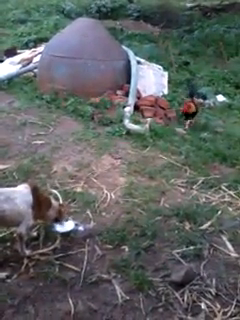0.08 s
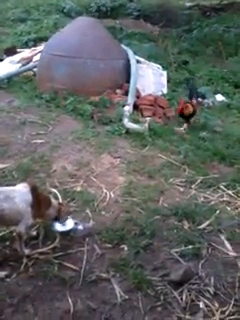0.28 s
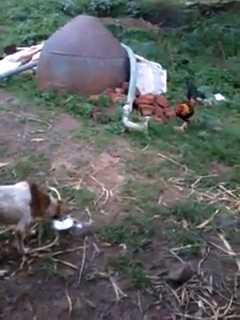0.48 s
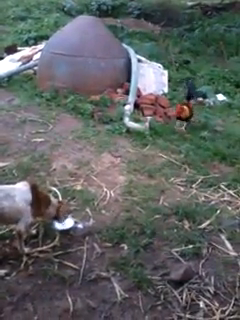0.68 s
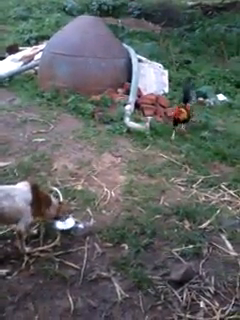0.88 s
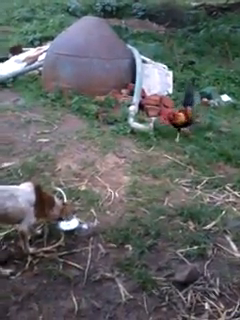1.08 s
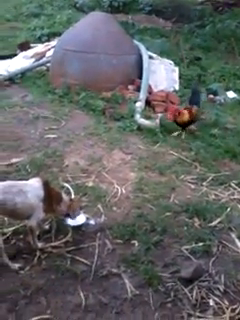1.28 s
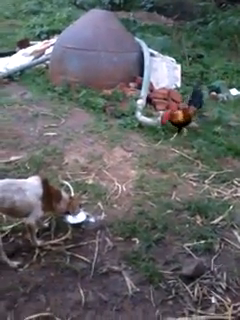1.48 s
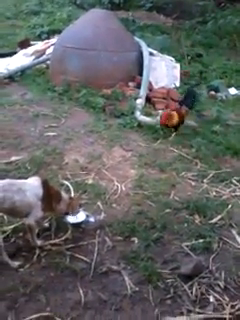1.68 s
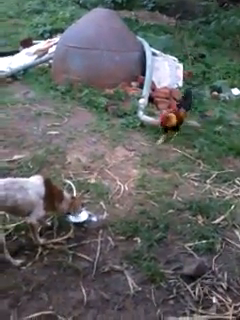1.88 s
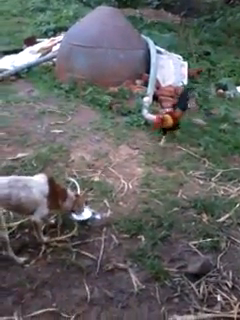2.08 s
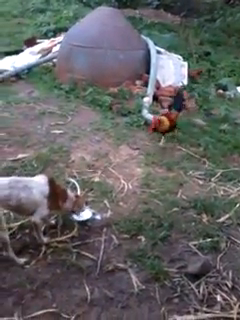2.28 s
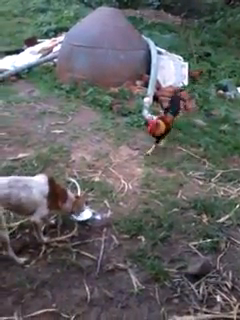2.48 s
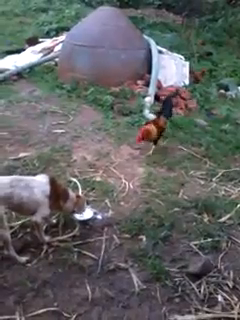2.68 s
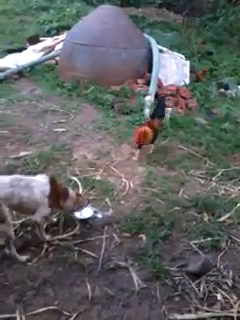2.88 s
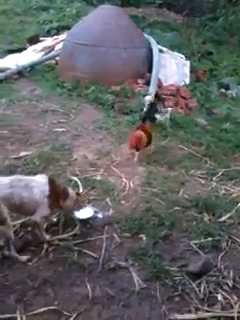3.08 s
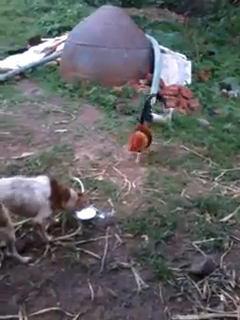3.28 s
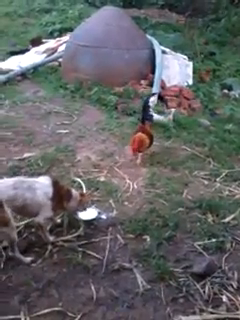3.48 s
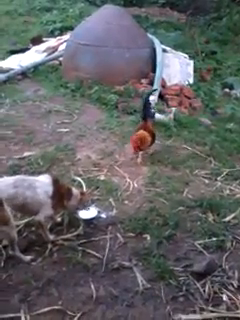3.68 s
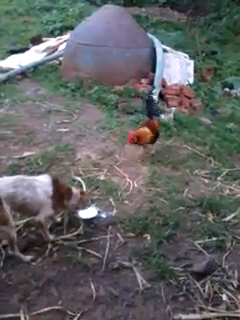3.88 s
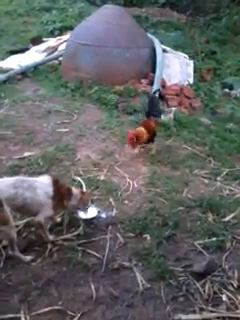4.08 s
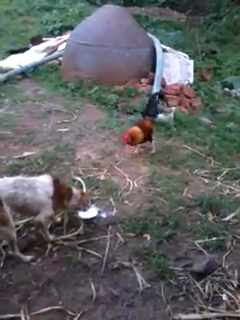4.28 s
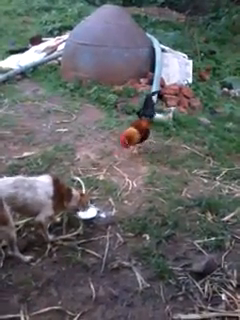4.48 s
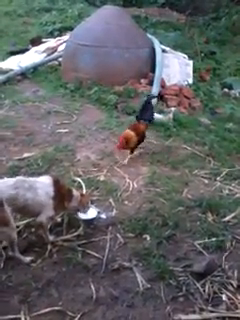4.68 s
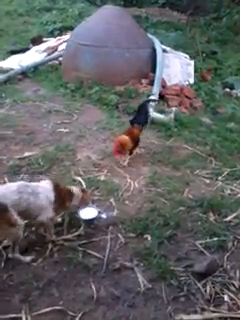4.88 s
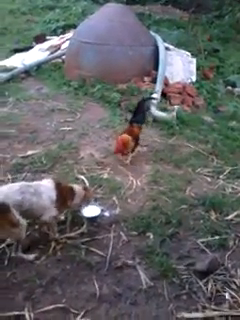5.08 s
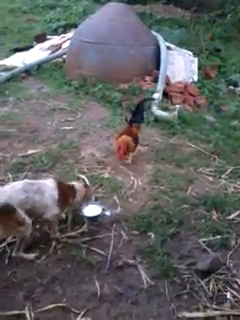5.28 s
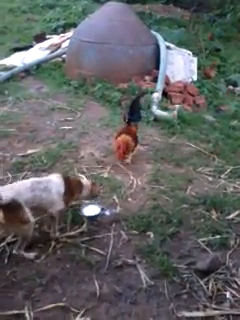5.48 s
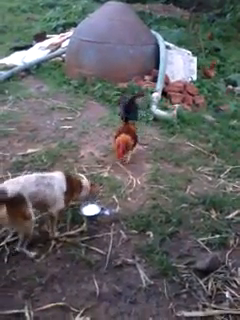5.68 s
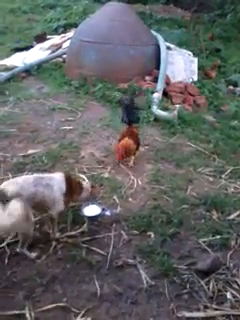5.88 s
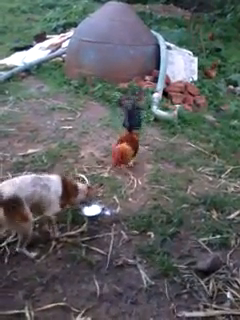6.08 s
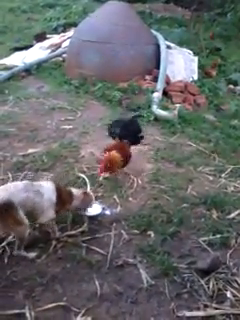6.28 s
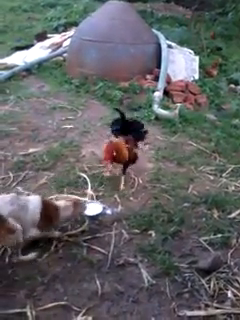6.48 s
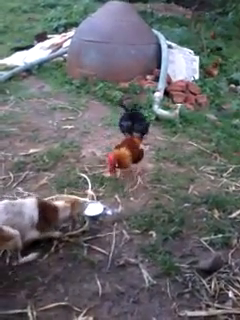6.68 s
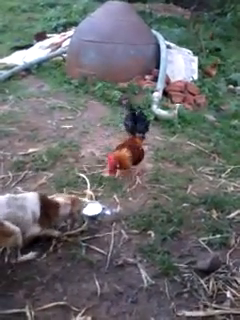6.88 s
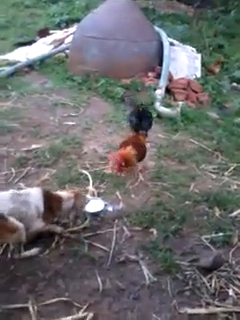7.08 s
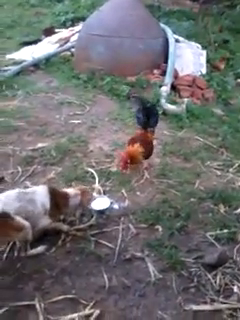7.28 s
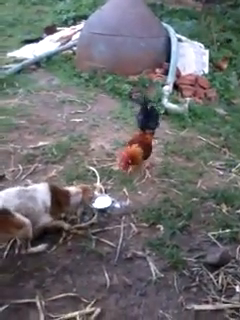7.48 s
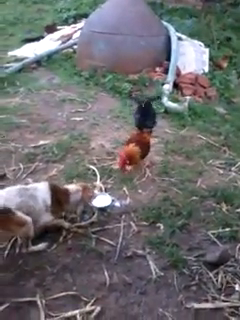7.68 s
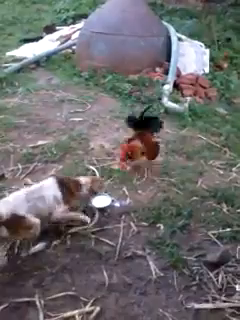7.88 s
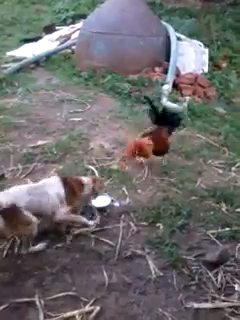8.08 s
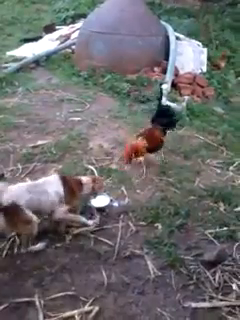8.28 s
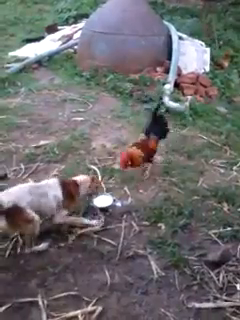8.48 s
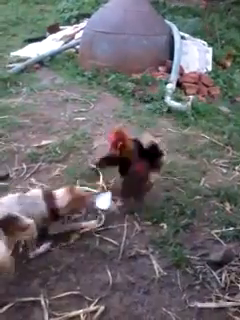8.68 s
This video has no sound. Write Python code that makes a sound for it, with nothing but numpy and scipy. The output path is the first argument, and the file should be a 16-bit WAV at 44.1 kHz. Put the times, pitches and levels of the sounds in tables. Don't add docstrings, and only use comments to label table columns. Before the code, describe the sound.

A small dog growls hoarsely and gives seven short, sharp barks close by in a farm yard, with snorts, little clicks and distorted peaks.

```python
import sys
import numpy as np
from scipy import signal
from scipy.io import wavfile
from scipy.ndimage import uniform_filter1d, minimum_filter1d

SR = 44100
rng = np.random.default_rng(int(sys.argv[2]) if len(sys.argv) > 2 else 0)


def dump_mix(stems):
    frames = np.atleast_2d(stems).T
    limited = np.clip(frames, -1, 1)
    pcm = np.round(limited * 32767).astype(np.int16)
    wavfile.write(sys.argv[1], SR, pcm)


def volts_from_db(level):
    exponent = np.asarray(level, float) / 20
    return 10 ** exponent


N = 383669


def rms_one(x):
    return x / np.sqrt(np.mean(x ** 2) + 1e-20)


def evened(x, over_s):
    return x / np.sqrt(uniform_filter1d(x ** 2, size=int(over_s * SR)) + 1e-12)


def drift(rate_hz):
    r = np.exp(-2 * np.pi * rate_hz / SR)
    noise = rng.standard_normal(N + SR)
    return rms_one(signal.lfilter([1], [1, -2 * r, r * r], noise)[SR:])


def filtered(x, order, hz, kind="low"):
    return signal.sosfilt(signal.butter(order, hz, kind, fs=SR, output="sos"), x)


def resonate(x, hz, width_hz):
    turn = np.exp(2j * np.pi * np.cumsum(np.broadcast_to(hz, N)) / SR)
    r = np.exp(-np.pi * 1.55 * width_hz / SR)
    return 2 * np.real(turn * signal.lfilter([(1 - r) ** 2], [1, -2 * r, r * r], x / turn))


def slaps(per_s, wobble, spread_db, air):
    cycles = np.cumsum(per_s * np.exp(wobble * drift(60))) / SR
    closures = np.diff(np.floor(cycles), prepend=0) * volts_from_db(spread_db * rng.standard_normal(N))
    puff = np.exp(-3.0 * (cycles % 1)) * rng.standard_normal(N)
    return rms_one(closures) + air * rms_one(puff)


def swells(peak_s, rise_s, fall_s, peak_db, edge_db, *carried):
    t = np.arange(0, N + 64, 64) / SR
    away = t - peak_s[:, None]
    away = away / np.where(away < 0, rise_s[:, None], fall_s[:, None])
    floor_db = -150 - 20 * abs(away) ** .5
    level_db = np.maximum(peak_db[:, None] - edge_db * away ** 2, floor_db)
    power = volts_from_db(2 * level_db) + 1e-300
    total = power.sum(axis=0)
    weakness = (power * np.minimum(away ** 2, 1)).sum(axis=0) / total
    curves = [np.sqrt(total), weakness]
    curves += [(power * column[:, None]).sum(axis=0) / total for column in carried]
    return [np.interp(np.arange(N) / SR, t, curve) for curve in curves]


def yard_noise(patchy_db):
    # (f/Hz, level per Hz/dB)
    yard_colour = [(15, -42), (25, 1.5), (58, -3.5), (102, -36), (321, -0.5), (518, 4.5), (855, -0.5),
                   (1010, 4), (1410, -9), (1880, -4.5), (3100, -14), (6820, -15.5), (7500, -41),
                   (9750, -71), (16500, -120)]
    hz, db = np.transpose(yard_colour)
    edges = 22 * 2 ** np.arange(0, 8.5, .4)
    white = rng.standard_normal((2, N))
    out = 0
    for k, (low, high) in enumerate(zip(edges, edges[1:])):
        band = filtered(white[k % 2], 2, [low, high], "band")
        band_db = np.interp(np.log(low * high) / 2, np.log(hz), db)
        out = out + band * volts_from_db(band_db + patchy_db * drift(20.0))
    return volts_from_db(-53.5) * rms_one(out)


def clicks():
    # (t/s, peak level/dB, f/Hz, length/s, bright level/dB)
    bowl_clicks = [(0.243, -34.5, 1060, 0.0095, 6), (0.756, -37, 495, 0.014, -28),
                   (0.888, -39, 520, 0.004, -16), (1.38, -38, 535, 0.0095, 3), (1.391, -39, 636, 0.032, 11),
                   (1.441, -32, 670, 0.028, 14), (1.499, -29, 720, 0.032, 6.5),
                   (2.194, -49, 729, 0.0096, 16), (2.207, -25.5, 710, 0.023, 9.5),
                   (2.258, -36, 730, 0.0094, -24), (2.294, -36, 704, 0.012, -25),
                   (2.343, -32.5, 686, 0.0097, -22), (2.616, -36.5, 1192, 0.031, -17),
                   (3.399, -33, 654, 0.013, 4), (3.429, -32, 710, 0.0087, -13),
                   (3.97, -33.5, 700, 0.0076, -21), (4.16, -30, 750, 0.01, -36),
                   (4.261, -36.5, 631.5, 0.0087, 8), (4.383, -39.5, 1895, 0.013, -25),
                   (7.148, -30, 653, 0.0044, -30), (7.304, -28, 534, 0.015, 0), (7.394, -23, 720, 0.018, 8),
                   (7.825, -46, 1022, 0.01, 11), (7.89, -36.5, 494, 0.016, -17),
                   (.12, -43, 600, .012, -20), (1.131, -32, 754, 0.011, -20), (1.853, -22, 750, 0.011, -20),
              (3.575, -28, 745, .012, -18), (4.226, -39, 647.7, .01, -22), (5.192, -35, 750, .012, -20),
              (7.197, -38, 803, 0.0097, -1), (8.46, -29, 649.8, .012, -23)]
    contacts = bowl_clicks
    out, white = np.zeros(N), rng.standard_normal((len(contacts), 2048))
    t = np.arange(2048) / SR
    for (s, db, hz, length_s, bright_db), noise in zip(contacts, white):
        burst = noise * np.sin(np.pi * np.clip(t / max(length_s, .002), 0, 1)) ** 2
        dull = filtered(burst, 2, [hz / 1.48, hz * 1.2], "band")
        bright = filtered(burst, 2, [1200, 3600], "band")
        click = dull / abs(dull).max() + volts_from_db(bright_db - 8.5) * bright / abs(bright).max()
        i = round((s - .002) * SR)
        out[i:i + 2048] += volts_from_db(db) * click
    return out


def growls():
    # (peak t/s, rise/s, fall/s, chest level/dB, mouth level/dB)
    long_growls = [(0.491, 0.049, 0.21, -40.5, -42.5), (0.638, 0.22, .1, -39.5, -51),
                   (.93, 0.02, .25, -37.5, -47.5), (1.15, 0.065, 0.04, -35, -43.5),
                   (1.264, 0.17, 0.077, -33, -42), (1.73, 0.13, 0.13, -40, -54),
                   (1.858, 0.13, 0.077, -30, -32), (2.004, 0.053, 0.038, -26, -26),
                   (2.451, 0.047, 0.073, -31, -32.5), (2.74, 0.16, 0.07, -53, -53),
                   (3.301, 0.085, 0.11, -54.5, -37.5), (3.52, .07, 0.1, -38.5, -48.5),
                   (3.601, 0.072, 0.11, -35.5, -27.5), (3.681, 0.066, 0.049, -30, -31),
                   (3.81, 0.092, 0.029, -35.5, -36.5), (5.272, 0.14, 0.052, -46, -39.5),
                   (5.76, 0.11, 0.068, -44, -36), (5.89, 0.15, 0.039, -43.5, -36),
                   (7.398, 0.13, .1, -33, -25), (7.488, 0.13, 0.15, -29.5, -44.5),
                   (8.19, 0.1, .12, -42.5, -39), (8.36, 0.043, 0.12, -34, -41.5),
                   (8.49, 0.13, 0.19, -27, -32.5)]
    # (peak t/s, fall/s, chest level/dB, mouth level/dB, chest f/Hz)
    grunts = [(.774, 0.031, -57.5, -46, 385.3), (2.081, 0.054, -46.5, -42.5, 302),
              (2.17, 0.057, -46, -48, 298), (2.62, 0.099, -63.5, -59, 298), (3.3, .04, -45.5, -35.5, 206),
              (3.881, .06, -40, -40.5, 208.5), (3.919, .05, -40.5, -46, 336.4),
              (3.992, 0.092, -40.5, -51, 298), (4.07, 0.038, -39.5, -51, 286.6),
              (4.138, 0.09, -37.5, -58, 314), (4.296, 0.11, -32, -43, 290.5),
              (4.411, 0.041, -41, -65, 315.8), (4.496, .04, -38, -54, 207.7),
              (4.529, .06, -38, -47.5, 353.6), (4.618, .06, -45.5, -41, 245),
              (2.789, .05, -46.5, -59.5, 245), (6.42, 0.172, -53.5, -41, 395.4),
              (6.89, 0.12, -33.5, -30, 314.2), (7.063, .12, -40, -41, 256),
              (7.202, 0.068, -52.5, -42.5, 329.2), (7.748, 0.21, -47.5, -56.5, 351.3),
              (8.29, .1, -30.5, -31.5, 312)]
    # (t/s, f/Hz)
    jaw = [(.5, 655), (1.1, 603), (1.269, 724), (1.7, 636), (1.86, 696), (2.5, 634), (3.35, 636),
           (3.5, 569.2), (3.65, 704), (3.82, 587), (4.3, 727), (5.251, 597), (5.8, 715), (6.45, 602),
           (7.42, 675), (8.28, 670), (8.41, 475), (8.521, 737)]
    growl_chest_hz, grunt_rise_s = 318.4, 0.0258
    rows = [(*growl, growl_chest_hz) for growl in long_growls]
    rows += [(s, grunt_rise_s, *rest) for s, *rest in grunts]
    s, rise_s, fall_s, chest_db, mouth_db, chest_hz = np.transpose(rows)
    chest_gain, weakness, chest_hz = swells(s, rise_s, fall_s, chest_db, 18, chest_hz)
    mouth_gain, closing = swells(s, rise_s, fall_s, mouth_db, 25.5)

    flaps = slaps(95, wobble=.35, spread_db=1.0, air=1.64)
    muffled = filtered(flaps, 6, 1200)
    chest_hz = chest_hz * (1 + 0.11 * drift(7.37) - .06 * weakness)
    hum = volts_from_db(-2 + 4 * drift(25)) * np.sin(2 * np.pi * np.cumsum(chest_hz) / SR)
    chest = evened(hum + evened(resonate(muffled, chest_hz, 51), 0.024), 0.033)

    mouth_hz = np.interp(np.arange(N) / SR, *np.transpose(jaw))
    mouth_hz = mouth_hz * (1 + 0.047 * drift(6.4) - 0.032 * closing)
    mouth = resonate(muffled, mouth_hz, 150) + volts_from_db(-6) * resonate(muffled, 951, 130)
    return chest_gain * chest + mouth_gain * evened(mouth, 0.036)


def breaths():
    # (peak t/s, rise/s, fall/s, level/dB, whistle f/Hz)
    wheezes = [(.55, 0.17, 0.16, -60.5, 2540), (.765, 0.042, 0.016, -60, 1560),
               (1.0, 0.18, 0.13, -64, 2350), (1.19, 0.1, 0.16, -59.5, 2480), (1.56, 0.02, .03, -59, 2500),
               (1.84, 0.035, 0.04, -49, 2480), (1.995, 0.023, 0.027, -47.5, 2500),
               (2.095, 0.018, 0.031, -48.5, 2700), (2.5, 0.058, .03, -53.5, 2550),
               (2.68, 0.159, .09, -57.5, 2300), (3.3, 0.054, 0.062, -50, 2250),
               (3.58, 0.038, 0.14, -51, 1800), (3.85, 0.69, 0.27, -62, 2000),
               (4.266, 0.029, 0.063, -56, 2440), (4.6, 0.09, 0.042, -56, 2680),
               (5.22, .06, .045, -48.5, 2380), (5.33, 0.36, .18, -60, 1890), (5.83, 0.11, 0.078, -46, 2750),
               (6.47, .06, 0.058, -50, 2740), (6.95, 0.5, 0.31, -52, 1850), (7.22, .15, .12, -48, 2050),
               (7.35, 0.1, 0.12, -39, 2200), (7.75, 0.11, 0.053, -59.5, 2450),
               (7.06, .04, 0.046, -51.5, 2504),
               (8.13, 0.051, .08, -51, 1860), (8.215, 0.057, 0.038, -46.5, 2855),
             (8.28, 0.071, .08, -48.5, 2093), (8.5, 0.13, 0.094, -53, 1800)]
    # (f/Hz, width/Hz, level/dB)
    nose_hiss = [(2700, 610, -4.5), (5700, 1400, -19)]
    s, rise_s, fall_s, level_db, whistle_hz = np.transpose(wheezes)
    gain, weakness, whistle_hz = swells(s, rise_s, fall_s, level_db, 13.5, whistle_hz)
    whistle_hz = whistle_hz * (1 - 0.056 * weakness)
    air = rng.standard_normal(N) * volts_from_db(2.5 * drift(40))
    wheeze = resonate(air, whistle_hz, 250) + volts_from_db(-15.5) * resonate(air, 1.87 * whistle_hz, 500)
    hiss = sum(volts_from_db(db) * resonate(air, hz, width_hz) for hz, width_hz, db in nose_hiss)
    return gain * evened(wheeze + volts_from_db(-5) * hiss, 0.04)


REST_HZ = 515.2


def bark_course(s, hold_s, db, onset_db, stretch, attack_s, onset_hz, top_hz, open_hz, shut_hz,
                clear, clear_late, rasp, rasp_late, tail_db):
    end, start_db = s + hold_s, db + onset_db
    sunk = stretch - 0.065
    strain_db, hold_sag_db, tail_rasp_db = -9.5, -4, -8
    # (t/s, effort/dB, pitch f/Hz, mouth f/Hz, clear level/dB, rasp level/dB, throat stretch)
    lead_in = (s - attack_s - .016, start_db - 52, .9 * onset_hz, .9 * open_hz, clear, rasp - 6, stretch)
    jump = (s - attack_s, start_db - 14.5, .95 * onset_hz, .97 * open_hz, clear, rasp - 5, stretch)
    onset = (s, start_db, onset_hz, open_hz, clear, rasp - 3, stretch)
    swell = (s + .3 * hold_s, db, (onset_hz + top_hz) / 2, open_hz, clear + strain_db, rasp, stretch)
    top = (s + 0.539 * hold_s, db + hold_sag_db / 3, top_hz, (open_hz + shut_hz) / 2,
           (clear + clear_late) / 2 + 3.5, (rasp + rasp_late) / 2, (stretch + sunk) / 2)
    hold_end = (end, db + hold_sag_db, REST_HZ, shut_hz, clear_late, rasp_late, sunk)
    drop = (end + 0.0079, db - 14, REST_HZ, shut_hz, clear_late, rasp_late + tail_rasp_db / 2, sunk)
    tail = (end + .11, db + tail_db, REST_HZ, 0.8 * shut_hz, clear_late, rasp_late + tail_rasp_db, sunk)
    return [lead_in, jump, onset, swell, top, hold_end, drop, tail]


def in_time(courses, fade_s=0.0052):
    t = np.arange(N) / SR
    s, *columns = np.transpose(np.concatenate(courses))
    gate = sum((t > rows[0][0]) & (t <= rows[-1][0]) for rows in courses) > 0
    return [np.interp(t, s, c) for c in columns], uniform_filter1d(gate * 1., size=int(fade_s * SR) + 1)


def barks():
    # (onset t/s, hold/s, effort/dB, onset against effort/dB, throat stretch at the start)
    bark_times = [
        (3, .09, -2, -9.5, 0.88),
        (4.904, .074, -2, -4, 0.98),
        (5.517, .113, -2, 2, 0.95),
        (6.162, .092, 0.5, -11, 1.016),
        (6.738, 0.054, -5, -5.5, 1.08),
        (7.991, .05, -2.5, 6.5, 1.04),
        (8.599, 0.039, -5, -5.5, 1.07),
    ]
    # (attack/s, onset f/Hz, top f/Hz, open mouth f/Hz, closing mouth f/Hz)
    bark_voices = [(0.00625, 515, 555, 650, 630), (.012, 440, 548, 720, 517), (0.0043, 452, 580, 880, 727),
                   (.01, 405, 545, 775, 600), (0.0056, 450, 520, 660, 700), (0.0025, 468, 520, 910, 830),
                   (0.036, 640, 440, 725, 660)]
    # (clear early/dB, clear late/dB, rasp early/dB, rasp late/dB, tail/dB)
    bark_tones = [(4.5, -2, -14.5, -12.5, -52), (1.5, 6, -12, -10, -41.5), (-5.5, -11, -6.5, -9.5, -45),
                  (1.5, 3.5, -14, -1.5, -37.5), (1, -10, -19, -15, -48), (-19.5, -6, -2, 5.5, -51.5),
                  (-7.5, -4.5, -15, -8, -25)]
    # (f/Hz, width/Hz, level/dB)
    throat_rings = [(1737, 200, 3), (2508, 234, -1), (3320, 380, -9.5), (4450, 1200, -18.5)]
    courses = [bark_course(*b, *v, *h) for b, v, h in zip(bark_times, bark_voices, bark_tones)]
    (effort_db, pitch_hz, mouth_hz, clear_db, rasp_db, throat), gate = in_time(courses)

    phase = 2 * np.pi * np.cumsum(pitch_hz * (1 + .022 * drift(55))) / SR
    octave_db = -8 + .03 * (mouth_hz - 645) + 0.0039 * (pitch_hz - REST_HZ) + 6.04 * drift(78)
    clear = volts_from_db(3.0 * drift(40)) * np.sin(phase) + volts_from_db(octave_db) * np.sin(2 * phase)

    chaos = slaps(170, wobble=.45, spread_db=5.5, air=2.05)
    mouth = evened(resonate(chaos, mouth_hz, 105), 0.024)
    stretch = throat + 0.014 * drift(7.7)
    gust = chaos + 3.3 * rng.standard_normal(N)
    rings = sum(volts_from_db(db) * resonate(gust, hz * stretch, width_hz) for hz, width_hz, db in throat_rings)
    rasp = evened(rings, 0.032)
    voice = volts_from_db(clear_db) * clear + mouth + volts_from_db(rasp_db) * rasp
    return gate * volts_from_db(effort_db) * evened(voice, 0.02)


def echoes(x):
    t = np.arange(SR // 2) / SR
    fade_60db_s = 0.37
    returns = rng.standard_normal(len(t)) * volts_from_db(-60 * t / fade_60db_s) * (t > .015)
    dull = filtered(filtered(returns, 1, [400, 2000], "band"), 2, 2900)
    shed_hz, shed_width_hz = 556, 290
    dull = dull + volts_from_db(1) * signal.lfilter(*signal.iirpeak(shed_hz, shed_hz / shed_width_hz, fs=SR), dull)
    return volts_from_db(-24) * signal.fftconvolve(x, dull / np.sqrt(np.sum(dull ** 2)))[:N]


def scene():
    dog = filtered(barks() + growls() + breaths(), 6, 162, "high")
    return (dog + echoes(dog) + clicks() + yard_noise(patchy_db=2.0))[None]


def faint_bands_dropped(x):
    frames = signal.stft(np.r_[x, x[:-1025:-1]], nperseg=512, noverlap=256)[2]
    bands = uniform_filter1d(abs(frames) ** 2, size=5, axis=0)
    loudest = np.roll(-minimum_filter1d(-bands.max(axis=0), size=11), -2)
    kept = bands > loudest ** .7 * volts_from_db(2 * -59)
    kept[:2] = True
    return signal.istft(frames * kept, nperseg=512, noverlap=256)[1][:N]


def low_pass(x):
    return signal.sosfilt(signal.butter(12, 15910, fs=SR, output="sos"), x)


def record(dry):
    first_ceiling, clip_level, treble_cut_hz = .74, .72, 6630 * 1.207
    hit = np.clip(dry[0], -first_ceiling, first_ceiling)
    narrow = signal.sosfilt(signal.cheby2(14, 60, treble_cut_hz, fs=SR, output="sos"), hit)
    clipped = np.clip(faint_bands_dropped(narrow), -clip_level, clip_level)
    ending = np.minimum(np.arange(N)[::-1] / 100, 1)
    return low_pass(ending * clipped[None])


dry = scene()
out = record(dry)
dump_mix(out)
```